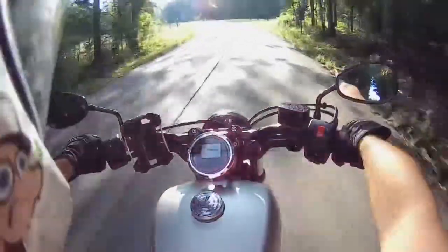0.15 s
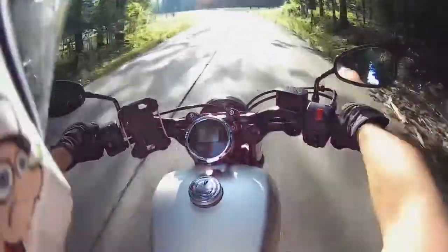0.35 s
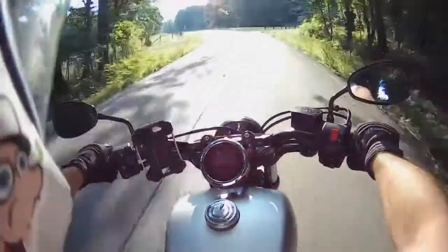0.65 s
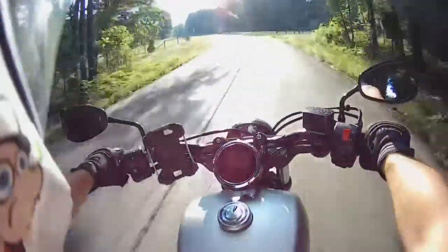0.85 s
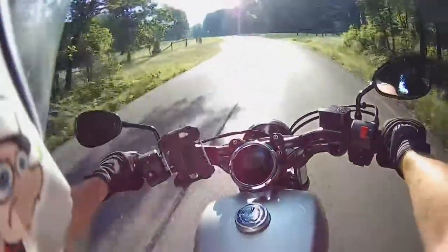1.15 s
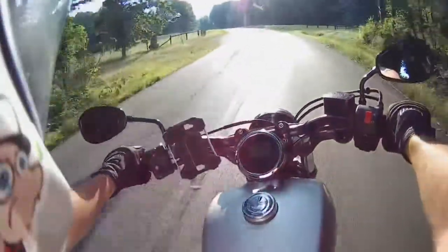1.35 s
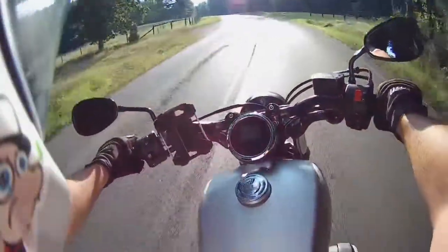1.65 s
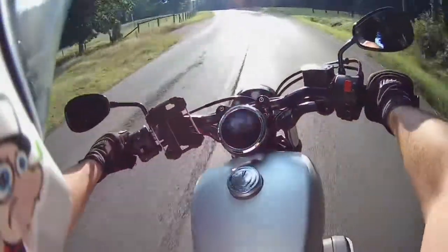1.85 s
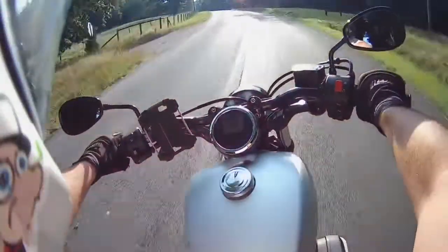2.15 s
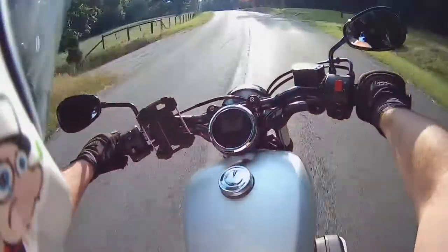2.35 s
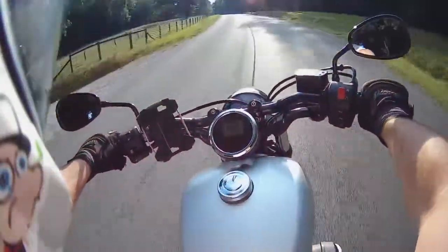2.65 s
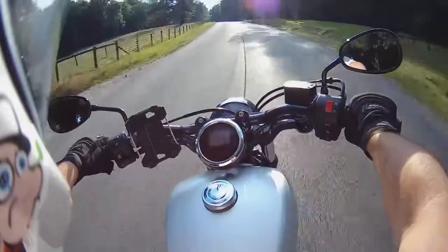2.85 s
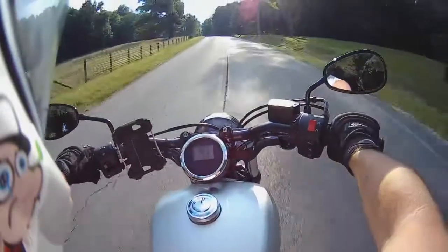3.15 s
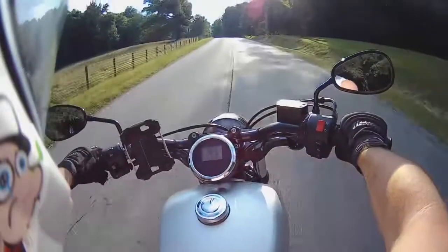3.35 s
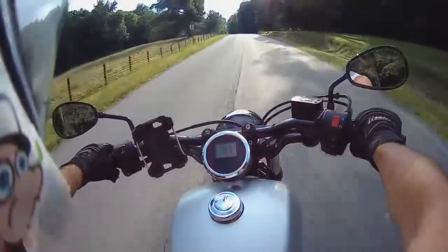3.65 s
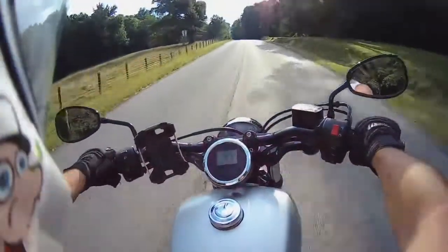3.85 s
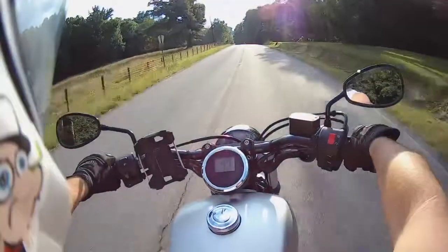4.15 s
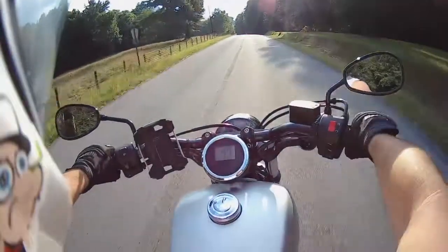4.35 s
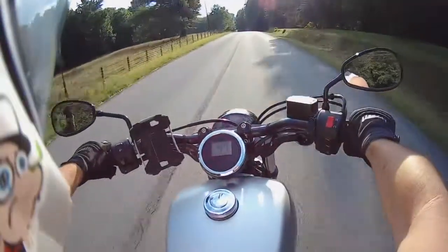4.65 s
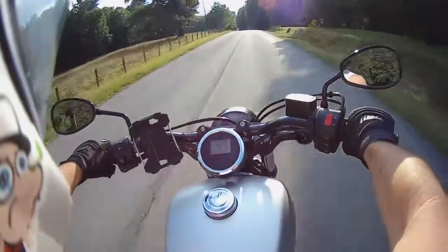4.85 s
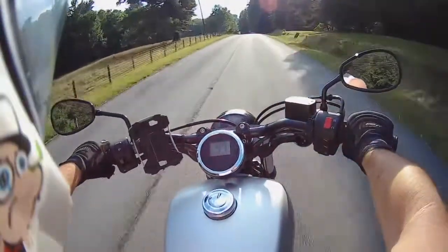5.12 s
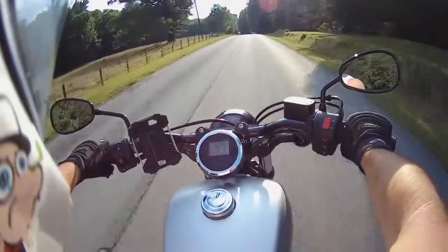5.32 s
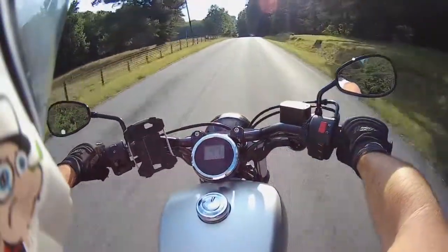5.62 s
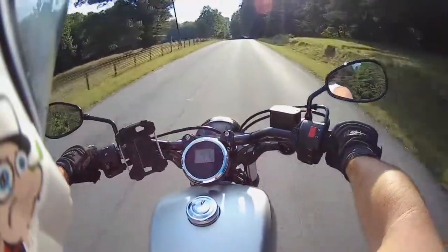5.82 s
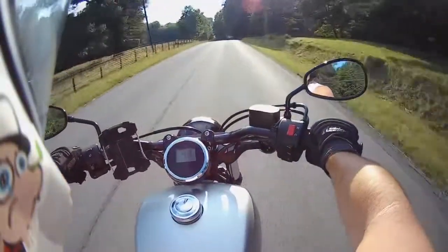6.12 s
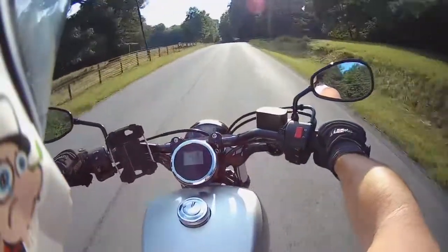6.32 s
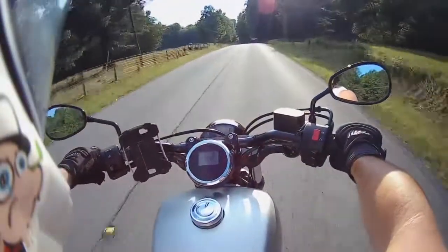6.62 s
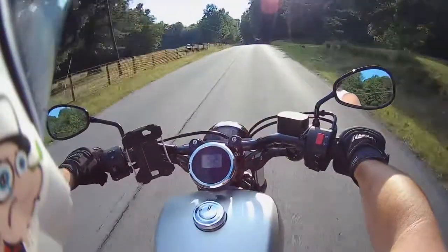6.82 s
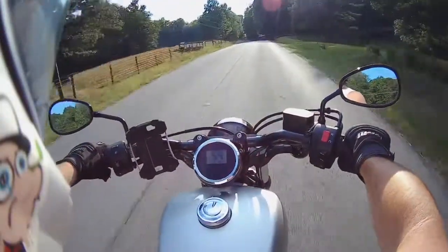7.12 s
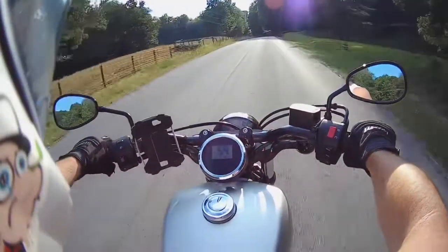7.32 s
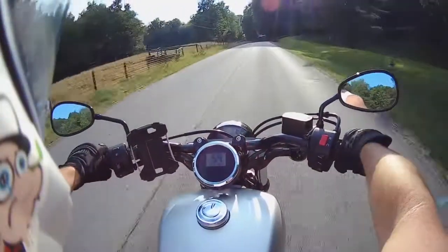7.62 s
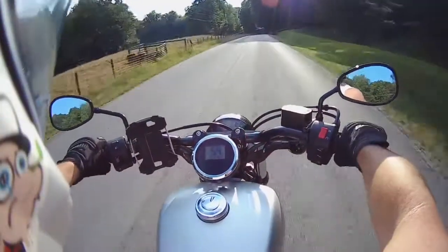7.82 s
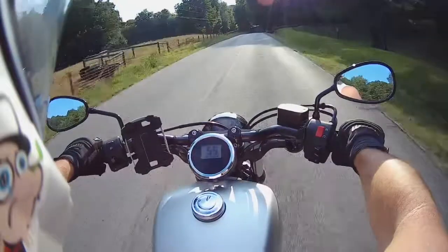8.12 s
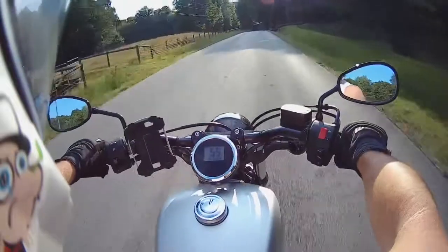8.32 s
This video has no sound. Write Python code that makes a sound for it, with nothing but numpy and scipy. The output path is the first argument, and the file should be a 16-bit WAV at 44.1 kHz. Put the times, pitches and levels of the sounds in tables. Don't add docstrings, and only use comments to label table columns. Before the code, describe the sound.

A raw twin-cylinder exhaust throbs close to the microphone outdoors. After an opening shift with loud cracks, the engine accelerates steadily, its pulses growing harder and raspier with hiss between them. The revs fall for another shift around four seconds, with dull pops, then build strongly again. At the end it rolls off, leaving a quieter, lower burble under growing wind rumble, with a faint pop.

```python
import sys
import numpy as np
from scipy import signal
from scipy.io import wavfile
from scipy.ndimage import uniform_filter1d, minimum_filter1d

SR = 44100
rng = np.random.default_rng(int(sys.argv[2]) if len(sys.argv) > 2 else 0)


def inscribe(sig):
    pcm = np.round(np.clip(np.atleast_2d(sig).T, -1, 1) * 32767)
    wavfile.write(sys.argv[1], SR, pcm.astype(np.int16))


def volts_from_db(level):
    exponent = np.asarray(level, float) / 20
    return 10 ** exponent


N = 373919


def evened(x):
    return x / np.sqrt(np.mean(x ** 2) + 1e-20)


def follow(rows, t):
    s, *columns = np.transpose(rows)
    return [np.interp(t, s, column) for column in columns]


def add(mix, s, sound):
    at = round(s * SR)
    sound = sound[max(-at, 0):]
    part = mix[max(at, 0):][:len(sound)]
    part += sound[:len(part)]


def noise(spectrum, patchy_db, flicker_db, size=1024):
    hop, hz = size // 4, np.fft.rfftfreq(size, 1 / SR)
    real, imag, lumps = rng.standard_normal((N // hop + 5, len(hz), 3)).T
    patches = uniform_filter1d(lumps, size=5, axis=0)
    patches = evened(uniform_filter1d(patches, size=6, axis=1))
    flicker = evened(uniform_filter1d(lumps[0], size=4))
    f, level_db = np.transpose(spectrum)
    mean_db = np.interp(np.log(hz + 1), np.log(f + 1), level_db)[:, None]
    field = (real + 1j * imag) * volts_from_db(mean_db + patchy_db * patches + flicker_db * flicker)
    return evened(signal.istft(field, nperseg=size, noverlap=size - hop)[1][:N])


# t/s, f/Hz
FIRING_RATE = [(0.0, 31.744), (0.36, 22.865), (0.48, 26.146), (0.8, 25.86), (1.15, 26.314), (1.45, 26.665),
               (1.8, 27.559), (2.3, 28.856), (2.7, 29.776), (3.2, 30.971), (3.6, 31.723), (3.84, 31.916),
               (3.92, 28.651), (4.25, 25.999), (4.4, 26.134), (4.7, 25.183), (5.1, 26.097), (5.85, 27.56),
               (6.1, 27.98), (6.3, 28.341), (6.8, 28.989), (7.33, 29.446), (7.42, 23.092), (7.8, 26.647),
               (8.0, 24.148)]
START_CYCLE, REAR_LAG = .03, 7 / 12


def cycles():
    return START_CYCLE + np.cumsum(follow(FIRING_RATE, np.arange(N) / SR)[0]) / SR


# t/s, level/dB
THROTTLE = [(0.0, -15), (0.36, -32), (0.48, -21), (1.6, -15.5), (1.96, -9), (2.8, -7.5), (3.65, -9.5),
            (3.85, -13), (3.9, -18), (4.28, -31.5), (4.45, -20.5), (4.7, -20), (5.1, -10.5), (6.2, -10),
            (7.22, -11), (7.34, -17), (7.375, -24), (7.72, -30), (7.95, -21.5)]
# from t/s, boom below 450 Hz/dB, rasp 750-1500 Hz/dB, crack above 1.5 kHz/dB,
# gas heat as a factor on pipe pitch
LOADS = [
    (0, 3, 5.5, -7.5, 0.98),
    (0.361, -0.2, 0, -17, 0.99),
    (3.87, 1, 1, -9, 1.0),
    (4.22, 0, 0.5, -14.5, 0.96),
    (5.6, 1, 3, -15.5, 0.96),
    (6.121, -.5, 5.5, -14.5, 0.99),
    (7.03, -1.5, 5.5, -17, 0.98),
    (7.36, 1, 2.5, -10.5, 0.98),
    (7.75, -2, -3, -17, 0.99),
]
OPEN_DB, SHUT_DB = -9, -33
SHUT_BOOM_DB, SHUT_RASP_DB, SHUT_CRACK_DB = 5.5, 0.5, 1.5
REVS_BOOM_DB, REVS_RASP_DB, REVS_CRACK_DB, MID_REVS = -0.16, -0.82, -0.54, 26
STEADY, RAGGED, RAGGED_BEND = .03, .5, 3.2


def engine(t):
    bark_db = follow(THROTTLE, t)[0]
    revs = follow(FIRING_RATE, t)[0] - MID_REVS
    shut = np.clip((OPEN_DB - bark_db) / (OPEN_DB - SHUT_DB), 0, 1)
    engaged, *voice = np.transpose(LOADS)
    now = np.maximum(np.searchsorted(engaged, t) - 1, 0)
    boom_db, rasp_db, crack_db, heat = np.array(voice)[:, now]
    boom_db = boom_db + SHUT_BOOM_DB * shut + REVS_BOOM_DB * revs
    rasp_db = rasp_db + SHUT_RASP_DB * shut + REVS_RASP_DB * revs
    crack_db = crack_db + SHUT_CRACK_DB * shut + REVS_CRACK_DB * revs
    uneven = STEADY + RAGGED * shut ** RAGGED_BEND
    return bark_db, boom_db, rasp_db, crack_db, heat, uneven, shut


def ring(pipe, onset, s, gains, heat):
    hz, swing, t60 = np.transpose(pipe)[:, :, None]
    samples = np.arange(min(2600, int(t60.max() * SR)))
    t = np.maximum(samples / SR + round(s * SR) / SR - s, 0)
    modes = swing * volts_from_db(-60 * t / t60) * np.sin(2 * np.pi * hz * np.reshape(heat, (-1, 1)) * t)
    return gains @ modes * (1 - np.exp(-t / abs(onset[1])))


# f/Hz, signed swing, t60/s
FRONT_PIPE = [(233.8, -0.34, 0.033), (327, -0.43, 0.033), (423.3, -0.17, 0.035), (496.7, -0.37, 0.025),
              (606.8, 0.3, 0.041), (670.3, 0.4, 0.024), (798, 0.57, 0.031), (797.7, -1.48, 0.016),
              (889.3, -0.16, 0.053), (1065.5, 0.488, 0.019), (1096.4, -1.2, 0.013), (1270.6, 0.069, 0.046),
              (1330.6, 0.015, 0.039)]
# f/Hz, signed swing, t60/s
FRONT_MOUTH = [(1516, 0.075, 0.027), (1780, 0.065, 0.036), (1960, 0.013, 0.012), (2127, 0.061, 0.027),
               (2347, 0.077, 0.014), (2552, -0.052, 0.028), (2660, 0.046, 0.016), (3013, -0.013, 0.02),
               (3320, 0.026, 0.013), (3480, 0.002, 0.0059), (4000, -0.0057, 0.0059), (5100, -0.023, 0.0045)]
# f/Hz, signed swing, t60/s
REFLECTION = [(702.0, -0.187, 0.008), (1260.2, 0.027, 0.055)]
# f/Hz, signed swing, t60/s
REAR_PIPE = [(183.7, 0.2, 0.033), (286.9, -0.075, 0.017), (325, -0.088, 0.075), (396.3, 0.064, 0.068),
             (507, 0.062, 0.053), (627, -0.637, 0.013), (737, -0.011, 0.08), (754.5, 0.065, 0.057),
             (857, -0.023, 0.057), (920, 0.04, 0.063), (1038, -0.0093, 0.097), (1075, -0.033, 0.064),
             (1164, -0.005, 0.12),
             (1844, 0.012, 0.04), (2174, 0.017, 0.05), (2404, -0.028, 0.036)]
# from t/s, to t/s
OVERRUN = [
    (-1, .36),
    (3.87, 4.6),
    (7.36, 9),
]
FRONT_ONSET, MOUTH_ONSET, REAR_ONSET = (.00066, .0039), (.0004, .0013), (.00055, .0012)
REFLECTION_ONSET = (-.00675, .00026)
OVERRUN_FRONT_DB, OVERRUN_REAR_DB = -2.5, 2
STEEP_DB, LINGER_DB = 10.5, 3.5
REAR_HASTE_S, HASTE_FROM = .00005, 28.5
BOOM_FOLLOWS_REVS = 0.087


def exhaust(crank):
    out, t = np.zeros(N), np.arange(N) / SR
    count = int(crank[-1])
    shots = rng.standard_normal((2, count, 3))
    crank_curve = np.r_[0, crank]
    time_curve = np.r_[-crank[0] / FIRING_RATE[0][1], t]
    for pipe, onset, lag in ((FRONT_PIPE, FRONT_ONSET, 0), (FRONT_MOUTH, MOUTH_ONSET, 0),
                             (REFLECTION, REFLECTION_ONSET, 0),
                             (REAR_PIPE, REAR_ONSET, REAR_LAG)):
        rear = lag > 0
        fire = np.interp(np.arange(count) + lag, crank_curve, time_curve) - onset[0]
        bark_db, boom_db, rasp_db, crack_db, heat, uneven, _ = engine(fire)
        strength, timing, warmth = shots[int(rear)].T
        hz, _, t60 = np.transpose(pipe)
        load = np.clip((bark_db + 22) / 12, 0, 1)

        colour_db = np.where(hz > 1500, crack_db[:, None] + 15.5, 0)
        colour_db = np.where(hz < 450, boom_db[:, None], colour_db)
        mouth_db = 7.56 * load - 7.5 - 0.47 * follow(TURBULENCE, fire)[0]
        colour_db += (hz > 1500) * mouth_db[:, None]
        steep_db = (STEEP_DB + 1.24 * (crack_db + 11.5)) * load
        colour_db += (hz > 2600) * steep_db[:, None]
        colour_db += ((hz > 740) & (hz < 1500)) * rasp_db[:, None]
        lingers = ((abs(hz - 620) < 60) | (abs(hz - 1250) < 240)) & (t60 > .036)
        colour_db += LINGER_DB * lingers

        blast_db = bark_db + 17.0 + (-.2 + 1.3 * (1 - load)) * rear
        braking = sum((fire > a) & (fire < b) for a, b in OVERRUN)
        blast_db += braking * (OVERRUN_REAR_DB if rear else OVERRUN_FRONT_DB)
        blast_db += (.5 + 4 * uneven) * strength
        gains = volts_from_db(blast_db[:, None] + colour_db)
        gains *= 1 + 0.32 * uneven[:, None] * rng.standard_normal(gains.shape)

        fire -= rear * REAR_HASTE_S * (follow(FIRING_RATE, fire)[0] - HASTE_FROM)
        fire += .0006 * uneven * timing

        rate = follow(FIRING_RATE, fire)[0]
        heat *= 1 + .02 * uneven * warmth
        heat *= 1 + 0.0041 * (rate - HASTE_FROM)
        boom_bend = (rate[:, None] / HASTE_FROM) ** BOOM_FOLLOWS_REVS
        heat = heat[:, None] * np.where(hz < 450, boom_bend, 1)
        for s, g, h in zip(fire, gains, heat):
            add(out, s, ring(pipe, onset, s, g, h))
    return out


# t/s, peak level/dB, length/s, crack level/dB
BACKFIRES = [
    (0.279, -4.5, 0.011, 4),
    (0.298, -12.5, 0.0062, -3),
    (0.565, -5, 0.0036, 2),
    (0.6, -6.5, 0.0071, -7),
    (0.679, -11.5, 0.0069, -1),
    (4.155, -12, 0.0087, -2),
    (4.203, -7.5, 0.0032, -14),
    (4.222, -12, 0.003, -12),
    (4.544, -12, 0.0031, -2),
    (7.806, -16, 0.0042, -6),
]


def backfires():
    out, t = np.zeros(N), np.arange(600) / SR
    thud = ring(FRONT_PIPE, FRONT_ONSET, 0, np.ones(len(FRONT_PIPE)), 1)
    crack = ring(FRONT_MOUTH, MOUTH_ONSET, 0, np.ones(len(FRONT_MOUTH)), 1)
    for s, peak_db, length, crack_db in BACKFIRES:
        burst = 0.18 * rng.standard_normal(len(t)) * np.exp(-t / abs(length))
        burst[0] = 1
        blast = thud.copy()
        add(blast, 0, volts_from_db(crack_db - 5.0) * crack)
        pop = signal.fftconvolve(burst, blast)
        add(out, s - .0008, volts_from_db(peak_db) * pop / abs(pop).max())
    return out


# f/Hz, level/dB per Hz
ROAR = [(88, -42), (150, -6.5), (297, -30), (331, 8), (464, -3), (624, -8), (792, -2), (892, 2), (1250, -4),
        (1600, -18), (2080, -41), (3520, -120)]
# f/Hz, level/dB per Hz
HISS = [(880, -1), (1500, 0.5), (1720, -12.5), (1880, -7.5), (2050, -5), (2330, -3.5), (3730, -20.5),
        (5010, -22.5), (5690, -25.5), (6720, -26), (7340, -33), (9280, -32.5), (15600, -43)]
# t/s, level/dB
TURBULENCE = [(0, 14.5), (.22, -1), (.45, 11), (1.6, 6), (3.6, 4), (3.95, 3.5), (4.3, 8.5), (4.8, 4),
              (5.2, 12.5), (5.6, 5), (7.2, -3.5), (7.5, -6), (8.4, 3.5)]


def gas(crank):
    t = np.arange(N) / SR
    bark_db, _, _, crack_db, _, uneven, _ = engine(t)
    turbulence_db = follow(TURBULENCE, t)[0]
    front, rear = crank % 1, (crank - REAR_LAG) % 1
    puff = uniform_filter1d(np.exp(-front / 0.42) + 0.38 * np.exp(-rear / 0.42), size=60)
    roar_db = bark_db - 23 + 26 * uneven + turbulence_db
    roar = volts_from_db(roar_db) * evened(4.0 + puff) * noise(ROAR, 0.3, .1)

    load = np.clip((minimum_filter1d(bark_db, size=3000) + 12.5) / 8, .05, 1)
    spurt = volts_from_db(1.2 * rng.standard_normal(int(crank[-1]) + 2))[crank.astype(int)]
    spurt = spurt * volts_from_db(-.5 * turbulence_db)
    front_jet = spurt * np.exp(-((front - .075) / 0.033) ** 2)
    rear_jet = 0.32 * np.exp(-((rear - .07) / 0.39) ** 2)
    swell = .8 - 0.081 * load + 3.63 * load * (front_jet + rear_jet)
    hiss = volts_from_db(bark_db + crack_db - 2.0) * swell * noise(HISS, 1.67, 0.98, size=512)
    return roar + hiss


# f/Hz, level/dB per Hz
BUFFET = [(20, -44), (45, -7.5), (65, -8.5), (120, -4.5), (220, -3.5), (330, -8.5), (450, -14.5),
          (1200, -23), (4000, -50.5), (15000, -68.5)]
# t/s, level/dB
AIR_SPEED = [(0, -31.5), (.6, -34), (1.5, -32.5), (2.3, -33), (2.9, -32), (3.6, -30), (4.2, -28.5),
             (4.6, -29.5), (5, -28.5), (6, -27), (6.6, -27.5), (7.2, -28.5), (7.45, -25.5), (7.6, -26.5),
             (7.72, -27), (7.8, -26), (8.05, -25), (8.48, -26.5)]
WIND_DB, POWER_GAIN_DB, GUST_DB = 6, 0.5, 0.25


def wind():
    t = np.arange(N) / SR
    gusts = np.zeros(N)
    for f in np.geomspace(2, 9, 12):
        gusts += np.sin(2 * np.pi * (f * t + rng.random())) / np.sqrt(f)
    shut = engine(t)[-1]
    level_db = WIND_DB + follow(AIR_SPEED, t)[0] + POWER_GAIN_DB * (1 - shut) + GUST_DB * evened(gusts)
    return volts_from_db(level_db) * noise(BUFFET, 1.53, 0.36, size=4096)


ROAD_ECHO_S, ROAD_ECHO_DB = 0.0071, -21


def scene():
    crank = cycles()
    blasts = exhaust(crank) + backfires()
    heard = blasts + gas(crank) + wind()
    add(heard, ROAD_ECHO_S, volts_from_db(ROAD_ECHO_DB) * blasts)
    return heard[None]


def top_cut(x):
    return signal.sosfilt(signal.butter(12, 15750, fs=SR, output="sos"), x)


def record(dry):
    heard = signal.sosfilt(signal.butter(2, 45., "high", fs=SR, output="sos"), dry)
    clipped = np.clip(heard * volts_from_db(3.0), -.99, .99)
    return top_cut(clipped)


dry = scene()
out = record(dry)
inscribe(out)
```